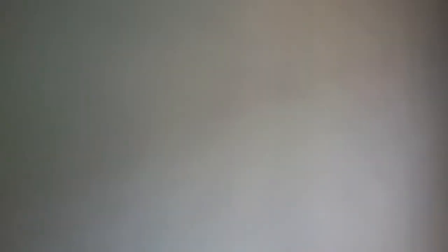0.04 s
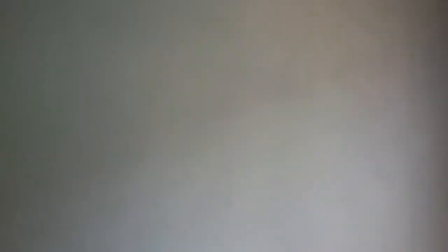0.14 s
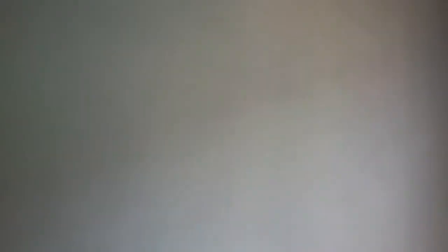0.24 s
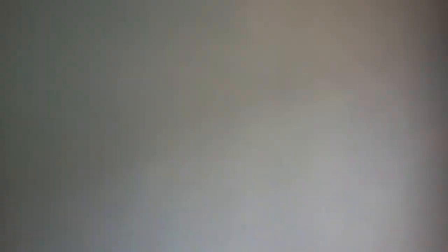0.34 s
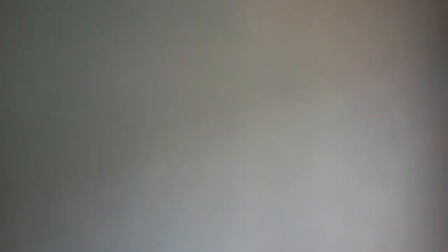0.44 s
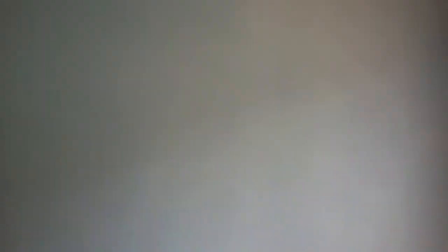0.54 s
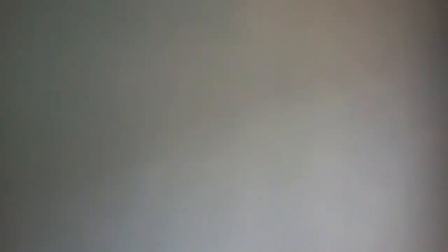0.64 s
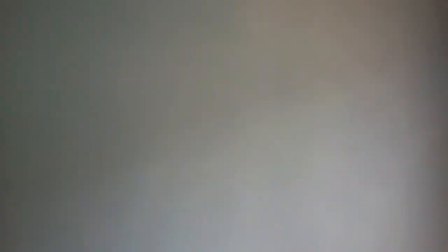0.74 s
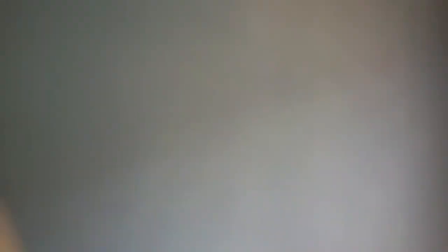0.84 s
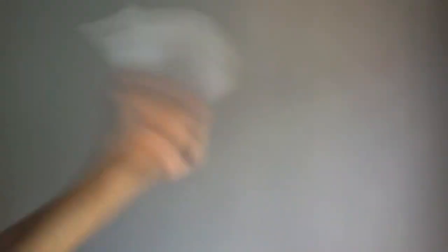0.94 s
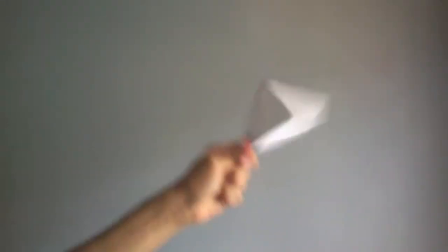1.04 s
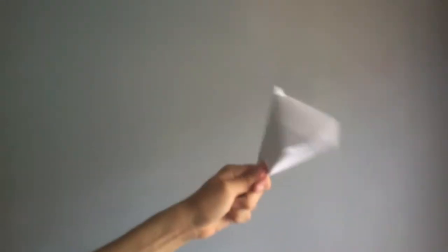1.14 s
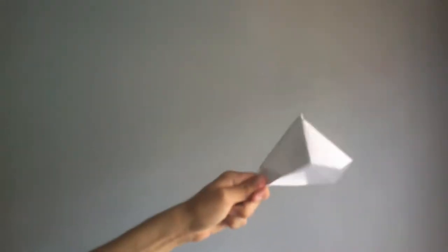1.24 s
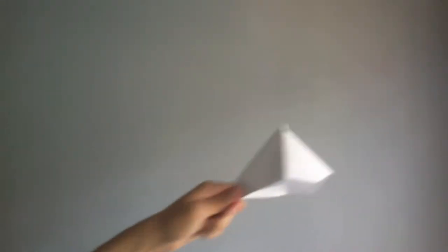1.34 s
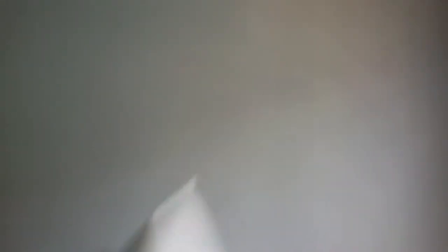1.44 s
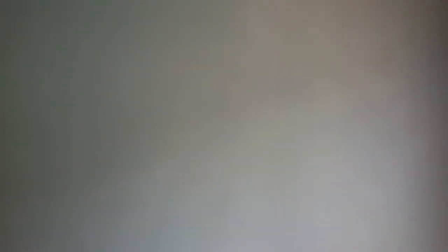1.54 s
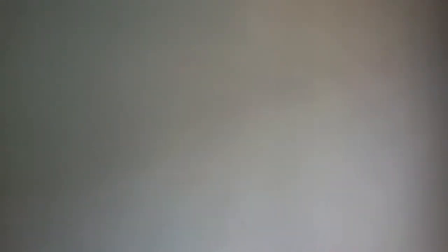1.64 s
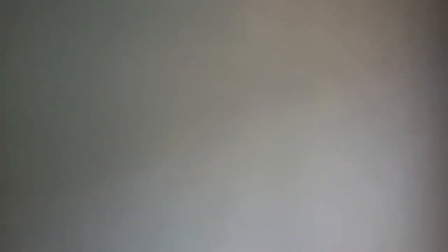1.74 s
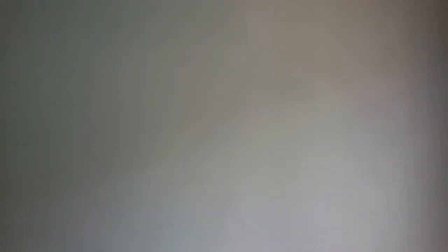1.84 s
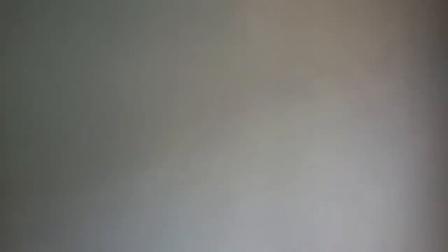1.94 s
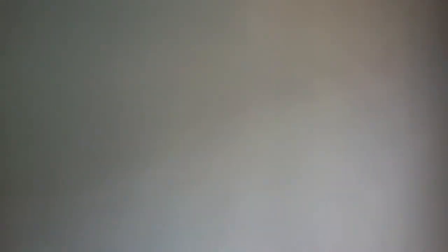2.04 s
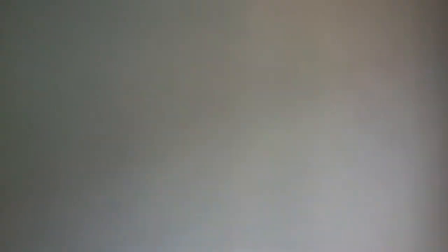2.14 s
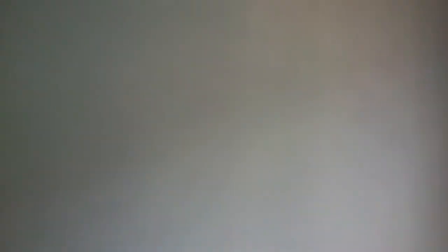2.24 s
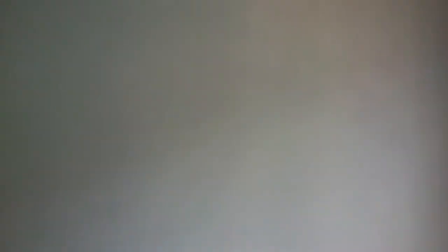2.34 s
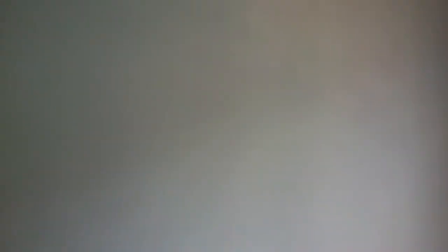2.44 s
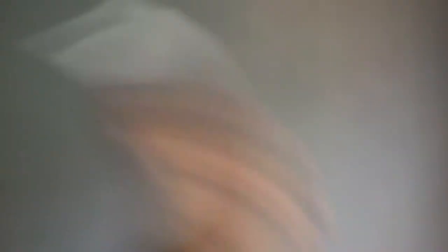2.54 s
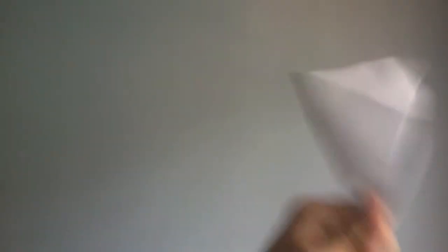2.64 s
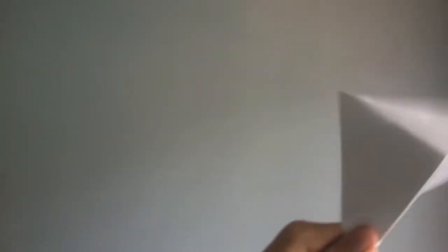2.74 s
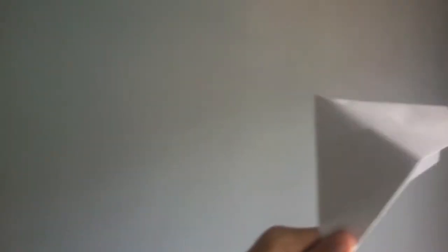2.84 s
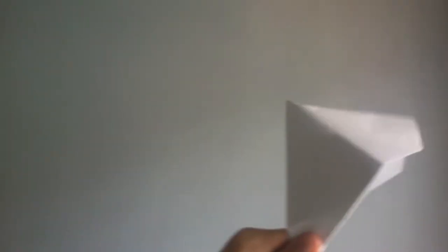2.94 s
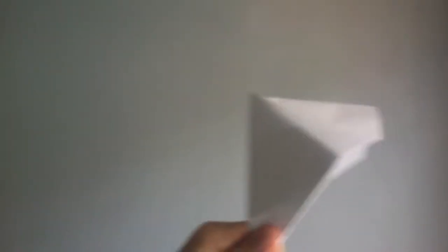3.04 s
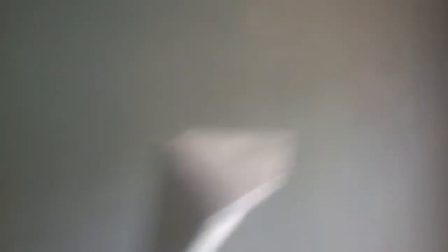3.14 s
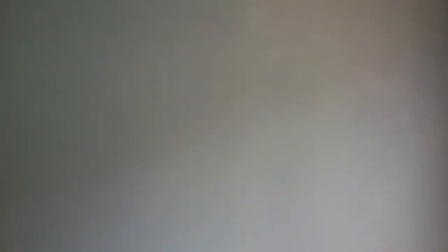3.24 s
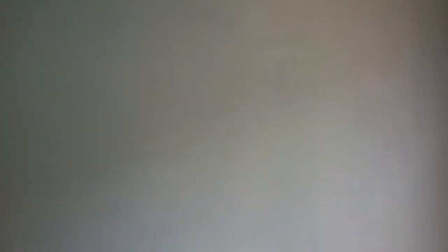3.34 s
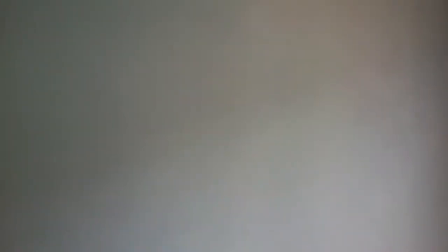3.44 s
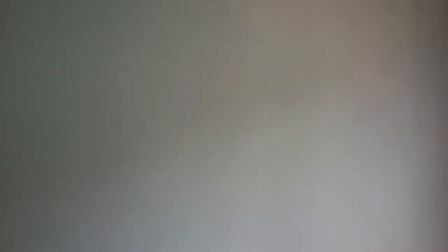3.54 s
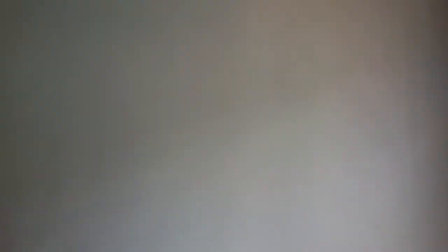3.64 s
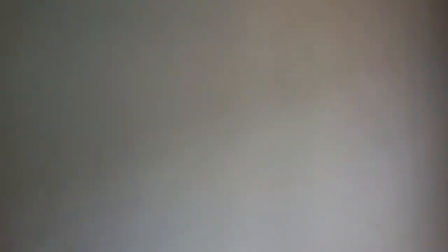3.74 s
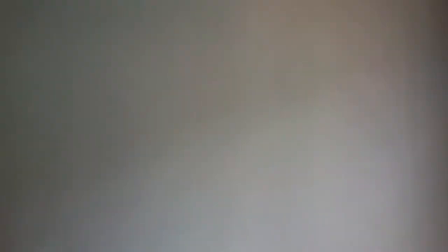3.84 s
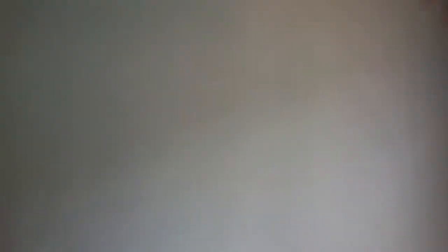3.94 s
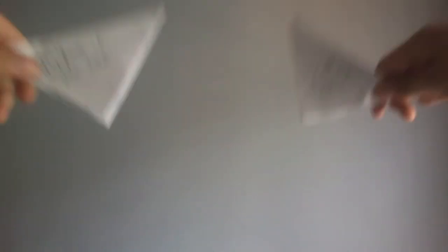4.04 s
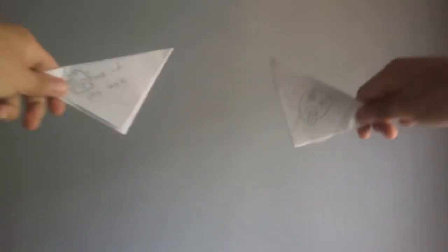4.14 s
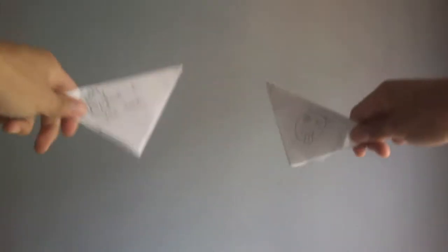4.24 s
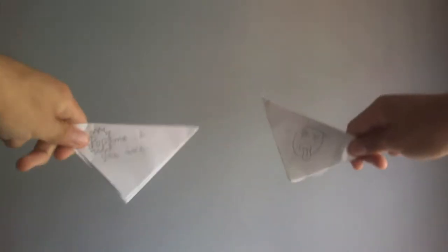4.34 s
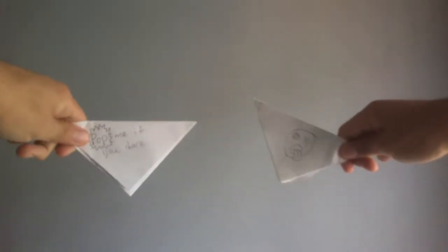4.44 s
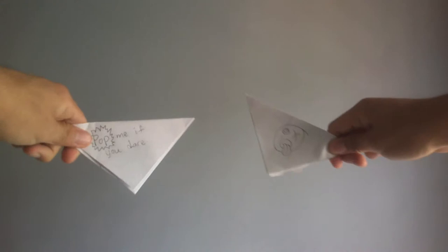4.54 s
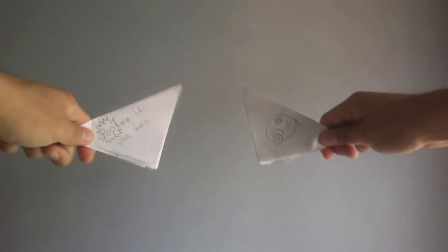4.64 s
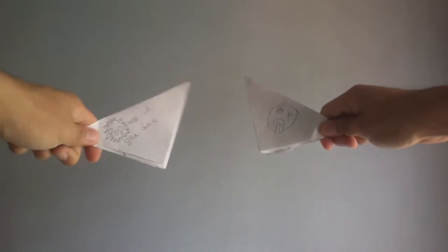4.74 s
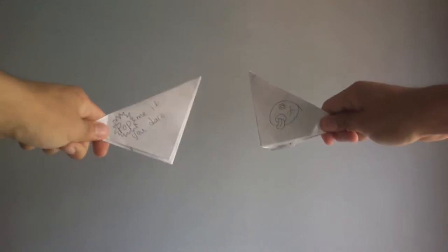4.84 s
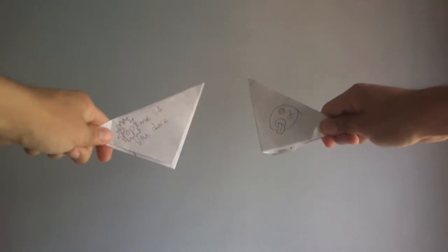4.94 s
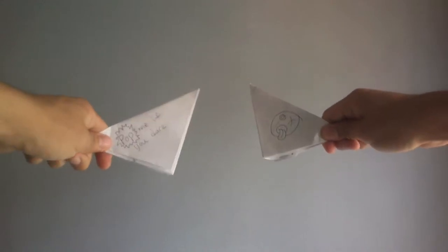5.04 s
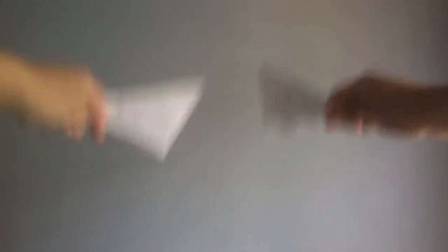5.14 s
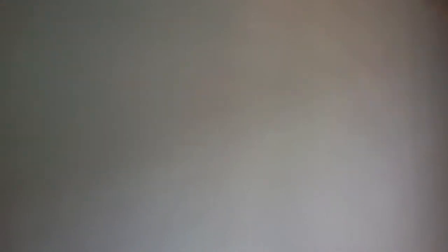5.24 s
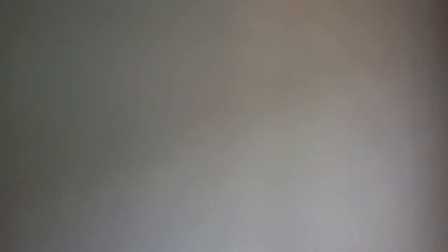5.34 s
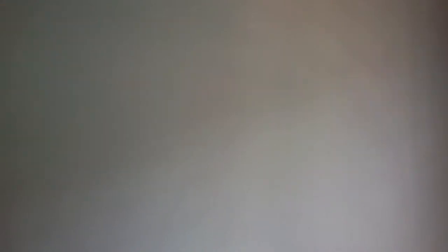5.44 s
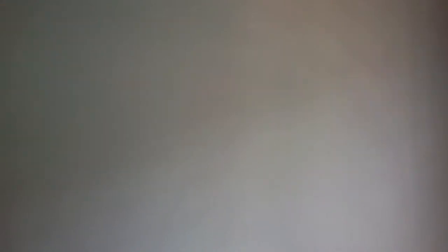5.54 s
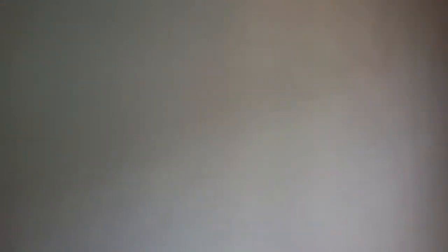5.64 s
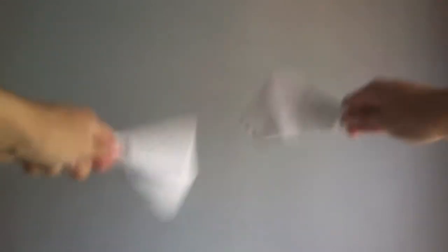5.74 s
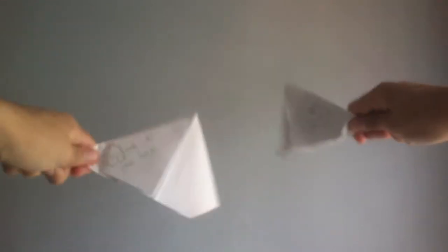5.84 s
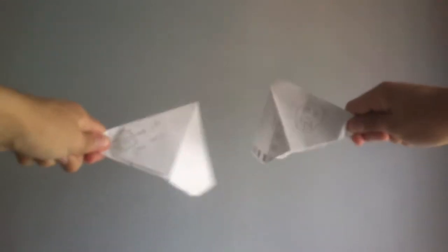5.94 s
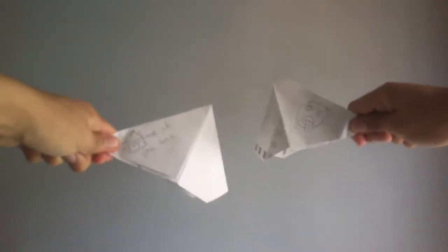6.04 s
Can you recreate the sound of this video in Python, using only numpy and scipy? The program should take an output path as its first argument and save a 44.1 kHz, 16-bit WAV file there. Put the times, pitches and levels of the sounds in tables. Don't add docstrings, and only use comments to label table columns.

```python
import sys
import numpy as np
from scipy import signal
from scipy.fft import rfft, irfft, next_fast_len
from scipy.io import wavfile
from scipy.ndimage import map_coordinates

SR = 44100
rng = np.random.default_rng(int(sys.argv[2]) if len(sys.argv) > 2 else 0)


def magnitude_from_level(level_db):
    exponent = np.asarray(level_db, float) / 20
    return 10 ** exponent


def put_to_file(sound):
    columns = np.atleast_2d(sound).T
    safe = np.clip(columns, -1, 1)
    whole_steps = np.round(safe * 32767)
    wavfile.write(sys.argv[1], SR, whole_steps.astype(np.int16))


N = 269451
T = np.arange(SR) / SR
SNAP_SIZE = SR // 50
SNAP_LEAD_S = .001

# time in seconds, length out in seconds, length in in seconds.
SCENE_FADES = [
    (.362, 0.13, 0.093),
    (2.228, 0.11, .1),
    (3.698, 0.097, 0.085),
]
# rumble in dB, room tone in dB, resting cloth in dB.
STEADY_DB = [
    (-61.5, -66, -95),
    (-63, -70, -83.5),
    (-62.5, -69, -83.5),
    (-63.5, -70, -90.5),
]
# frequency in Hz, density in dB per Hz.
RUMBLE_SPECTRUM = [(8.8, -33.5), (15, -1.5), (27, 1), (38, -1), (57, -6), (63, -9.5), (70, -21.5),
                   (110, -15.5), (140, -49), (240, -120)]
# frequency in Hz, density in dB per Hz.
TONE_SPECTRUM = [(53, -38), (90, -4), (127, -2), (151, -7), (214, -5.5), (255, -8.5), (316, -11),
                 (499, -12.5), (1110, -19), (1640, -22), (2380, -23), (4360, -28), (16000, -35.5)]
# start in seconds, level in dB, length in seconds.
GUST_PUFF = (5.7, -37, .1)
# start in seconds, length in seconds, centre in Hz, width in Hz, level in dB.
FOLD_SWISHES = [
    (5.29, .05, 500, 250, -74),
    (5.415, .07, 520, 250, -73),
    (5.43, .07, 1500, 400, -79),
    (5.56, .085, 520, 280, -69),
    (5.57, .07, 1650, 500, -74),
    (5.33, .05, 3500, 700, -79),
    (5.335, .04, 5000, 500, -81),
    (4.28, .45, 2330, 300, -80),
    (2.23, .24, 170, 90, -69),
    (.03, .2, 600, 300, -72),
]
# peak in seconds, rise in seconds, fall in seconds, cloth hiss in dB, low shuffle in dB.
ARM_GESTURES = [(0, .05, 0.12, -103, -72), (.26, .07, .12, -75, -78), (.91, 0.022, 0.079, -73, -66.5),
                (.944, 0.017, 0.0081, -52, -63.5), (1.84, 0.011, 0.08, -80, -67.5),
                (1.87, .04, .3, -71, -74), (1.98, 0.027, 0.13, -70.5, -62), (2.09, .1, 0.1, -72, -68.5),
                (2.3, 0.3, 0.048, -77, -71.5), (2.47, 0.067, 0.069, -74, -72.5),
                (3.2, 0.44, 0.17, -84, -68.5), (3.45, 0.057, .15, -74.5, -67.5),
                (3.5, 0.059, 0.11, -60.5, -63.5), (3.75, .15, .3, -83, -73.5), (3.97, .2, 0.21, -74, -75.5),
                (4.5, .25, .35, -93.5, -79), (4.66, 0.13, 0.17, -81, -85.5), (5.36, 0.34, 0.27, -81.5, -79),
                (5.6, 0.11, .15, -90, -70), (5.664, 0.052, 0.009, -66, -76)]
# peak in seconds, rise in seconds, fall in seconds, rustle in dB.
PAPER_RUSTLES = [
    (4.5, .35, 0.41, -80),
    (5.35, .15, .22, -78.5),
    (5.62, .06, .1, -76.5),
    (5.664, 0.055, .01, -64),
]
# frequency in Hz, density in dB per Hz.
DULL_CLOTH_SPECTRUM = [(2000, -30), (3500, -7.5), (5200, -0.5), (7000, -1), (8800, -4.5), (10500, -6.5),
                       (15500, -13), (16500, -35.5)]
# frequency in Hz, density in dB per Hz.
CLOTH_SPECTRUM = [(1200, -29.5), (2500, -3), (5000, 0), (7500, -0.5), (11000, -4), (15500, -6.5),
                  (16500, -27.5)]
# frequency in Hz, density in dB per Hz.
SHUFFLE_SPECTRUM = [(150, -24.5), (350, -8.5), (600, 0), (1100, 0), (1900, -3.5), (2500, -5.5),
                    (3500, -9.5), (5000, -19), (8000, -34)]
# frequency in Hz, density in dB per Hz.
PAPER_SPECTRUM = [(300, -37), (520, 5), (900, -14), (1700, -4), (2250, -2.5), (2800, -7), (4500, -8),
                  (7000, -24)]
TINK_TIMES_S = [2.152, 2.25, 2.03, 5.16, 2.25]
# level in dB, frequency in Hz, t60 in seconds.
TINK_MODES = [
    (-56, 520, .2),
    (-68, 1250, .4),
    (-70, 850, .3),
    (-68, 1250, .1),
    (-62, 140, .9),
]
# dip time in seconds, dip in dB, dip width in ms, rebound in dB, crack in dB.
SNAP_EVENTS = [
    (.94635, -12.5, .16, -14.5, -18.5),
    (2.55377, -2.3, .115, -5.5, -15),
    (5.66765, -2.5, .09, -14, -17),
    (5.6979, -7.5, .12, -22, -16.5),
]
POCKET_HZ = [1250, 1350, 1150, 600]
SHEET_HZ = [5040, 11500, 6500, 9000]
# frequency in Hz, density in dB per Hz.
CRACK_SPECTRUM = [(800, -25), (2000, -2), (3300, 1), (5000, -1), (8000, -2), (12000, -3), (15000, -7),
                  (17000, -30)]
# snap index, delay in seconds, dip in dB, crack in dB.
WALL_ECHOES = [(0, .0046, -11, -11), (0, .0107, -11, -16), (0, .0292, -7, -20), (0, .035, -14, -20),
               (1, .0053, -15, -12), (1, .0087, -13, -12), (1, .012, -16, -16), (1, .0213, -15, -18),
               (2, .0075, -11, -8), (2, .0091, -10, -11), (2, .0245, -15, -18), (2, .0216, -16, -18),
               (3, .0052, -11, -14), (3, .008, -12, -8), (3, .0157, -14, -16), (3, .0215, -12, -18)]
# level in dB, early part in dB re main, late part in dB re main.
TAIL_DB = [
    (-39, 4.5, -8),
    (-32, -0.5, -11.5),
    (-40.5, 15, -4.5),
    (-37.5, 0.5, -12),
]
# frequency in Hz, density in dB per Hz.
TAIL_SPECTRA = [
    [(35, -44), (60, -14), (160, -5.5), (400, -5), (640, -4.5), (1100, -6), (1400, -11), (1750, -4.5),
     (2250, -6.5), (2500, -8), (3200, -10), (5200, -12.5), (12700, -21), (16000, -29)],
    [(35, -35), (60, -19), (180, -12), (250, -5), (420, -4.5), (600, -4.5), (1300, -3), (1550, -6.5),
     (2150, -3.5), (2450, -6.5), (3300, -12), (5000, -14), (11000, -20.5), (16000, -30)],
    [(35, -40), (60, -15), (400, -6), (770, -11.5), (1500, -3), (2300, -8.5), (2550, 1.5), (3300, -13.5),
     (7200, -16), (16000, -25.5)],
    [(35, -53), (60, -18), (160, -11), (256, -7.5), (450, -11), (970, -12.5), (1660, -21.5), (2250, -13.5),
     (2550, -16.5), (3400, -17), (5000, -16.5), (10500, -23.5), (16000, -32)],
]
# frequency in Hz, t60 in seconds.
ROOM_T60 = [(60, 0.87), (250, 0.68), (700, 0.94), (1500, 0.79), (2500, 0.57), (5000, 0.63), (10000, 0.59),
            (16000, 0.43)]
# frequency in Hz, t60 in seconds.
LATE_T60 = [(100, 1.7), (300, 1.3), (1000, 1.4), (2250, 1.4), (2500, 1.3), (3300, 1.4), (4000, 1.05),
            (5200, 1.3), (7000, 0.8), (16000, .4)]
# frequency in Hz, level in dB, t60 in seconds.
ROOM_MODES = [
    [(644, -0.5, 0.58), (1720, -10, 0.8), (2135, -7, 0.46), (3300, -10, 0.59), (3295, -4, 0.34),
     (3640, -17.5, 0.73), (4538, -17.5, 0.61), (4800, -19, 0.57), (5300, -4.5, 0.3), (5160, 2, 0.22)],
    [(112, -16, .8), (164, -11, .6), (254, -4, 1.2), (363, 1.5, 0.45), (1001.7, -14, 0.88),
     (1210, -15, 0.82), (1420, -8.5, 0.52), (1650, -10, 0.5), (1890, -24.5, 1.3), (2140, -21.5, 2.7),
     (2934, -23, 0.7), (3520, -16, 0.33)],
    [(111.7, -2.5, .6), (171, -2.5, 0.85), (254.6, 5, 0.8), (360, -6, .5), (531, -0.5, 1), (764, 0, 0.37),
     (1280, -3, 0.52), (1650, -6, 0.69), (1840, -0.5, 0.66), (2160, -1.5, 0.55), (3040, -12, 0.57),
     (3460, -17, 0.49)],
]
# centre in Hz, width in Hz, gain in dB.
HOUSING_DIP = (2640, 380, -8)


def unit(x):
    return x / np.sqrt(np.mean(x ** 2) + 1e-20)


def along(points, hz):
    point_hz, value = np.transpose(points)
    return np.interp(np.log(hz + 1), np.log(point_hz + 1), value)


def wobble(knots_per_s):
    knots = rng.standard_normal(int(N * knots_per_s / SR) + 4)
    return map_coordinates(knots, [np.arange(N) * knots_per_s / SR])


def hiss(spectrum, size):
    m = next_fast_len(size)
    gain = magnitude_from_level(along(spectrum, np.fft.rfftfreq(m, 1 / SR)))
    return unit(irfft(rfft(rng.standard_normal(m)) * gain, m)[:size])


def add(out, start_s, x):
    part = out[round(start_s * SR):][:len(x)]
    part += x[:len(part)]


def steady_levels_db():
    change_s = [s for s, *_ in SCENE_FADES]
    return np.array(STEADY_DB)[np.searchsorted(change_s, np.arange(N) / SR)].T


def background():
    rumble_db, tone_db, _ = steady_levels_db()
    rumble = magnitude_from_level(rumble_db + 1.3 * wobble(5)) * hiss(RUMBLE_SPECTRUM, N)
    tone = magnitude_from_level(tone_db + 0.91 * wobble(13)) * hiss(TONE_SPECTRUM, N)
    return rumble + tone


def gust():
    out = np.zeros(N)
    start_s, db, length_s = GUST_PUFF
    envelope = np.sin(np.pi * np.clip(T / length_s, 0, 1))
    add(out, start_s, magnitude_from_level(db) * np.sin(2 * np.pi * 17 * T) * envelope)
    return out


def swishes():
    out = np.zeros(N)
    for start_s, length_s, hz, width_hz, db in FOLD_SWISHES:
        air = signal.lfilter(*signal.iirpeak(hz, hz / width_hz, SR), rng.standard_normal(SR))
        envelope = np.sin(np.pi * np.clip(T / length_s, 0, 1))
        add(out, start_s, magnitude_from_level(db) * unit(air) * envelope)
    return out


def swells(rows):
    swell_db, rounding = 15, 1.1
    peak_s, rise_s, fall_s, *peaks_db = np.transpose(rows)[:, :, None]
    late_s = np.arange(N) / SR - peak_s
    distance = np.maximum(-late_s / np.abs(rise_s), late_s / np.abs(fall_s))
    shape = magnitude_from_level(-swell_db * distance ** rounding)
    return [np.sqrt(((magnitude_from_level(db) * shape) ** 2).sum(axis=0)) for db in peaks_db]


def clothing():
    rub_gain, shuffle_gain = swells(ARM_GESTURES)
    resting_gain = magnitude_from_level(steady_levels_db()[2])
    early = np.arange(N) / SR < SCENE_FADES[1][0]
    cloth = np.where(early, hiss(DULL_CLOTH_SPECTRUM, N), hiss(CLOTH_SPECTRUM, N))
    rub = np.hypot(rub_gain, resting_gain) * magnitude_from_level(1.1 * wobble(60)) * cloth
    shuffle = shuffle_gain * magnitude_from_level(1.3 * wobble(40)) * hiss(SHUFFLE_SPECTRUM, N)
    return rub + shuffle


def paper():
    return swells(PAPER_RUSTLES)[0] * magnitude_from_level(2.5 * wobble(52)) * hiss(PAPER_SPECTRUM, N)


def tinks():
    out = np.zeros(N)
    onset = 1 - np.exp(-T / 0.0036)
    for start_s, (db, hz, t60_s) in zip(TINK_TIMES_S, TINK_MODES):
        add(out, start_s, magnitude_from_level(db - 60 * T / t60_s) * np.sin(2 * np.pi * hz * T) * onset)
    return out


def dying(spectrum, size, fall):
    hz, t, z = signal.stft(hiss(spectrum, SR), SR, nperseg=size)
    return signal.istft(z * fall(hz[:, None], t), SR, nperseg=size)[1][:SR]


def tail(spectrum, early_db, late_db):
    uneven = np.exp(.18 * rng.standard_normal((1025, 1)))

    def main_fall(hz, t):
        t60_s = along(ROOM_T60, hz)
        return magnitude_from_level(-60 * (t - .05) / t60_s) + magnitude_from_level(early_db - 60 * t / (0.48 * t60_s))

    def late_fall(hz, t):
        return magnitude_from_level(late_db - 60 * t / (uneven * along(LATE_T60, hz)))

    echoes = np.repeat(rng.standard_normal(SR // 20 + 1), 20)[:SR]
    sparse = magnitude_from_level(3.6 * np.exp(-T / 0.025) * echoes)
    main = dying(spectrum, 256, main_fall)
    late = dying(spectrum, 2048, late_fall)
    return (main * sparse + late) * (1 - np.exp(-(T / .003) ** 2))


def reverberation():
    out = np.zeros(N)
    for (snap_s, *_), (db, early_db, late_db), spectrum in zip(SNAP_EVENTS, TAIL_DB, TAIL_SPECTRA):
        add(out, snap_s, magnitude_from_level(db) * tail(spectrum, early_db, late_db))
    return out


def room_rings():
    out = np.zeros(N)
    onset = 1 - np.exp(-T / 0.0049)
    for k, modes, db in zip((0, 1, 3), ROOM_MODES, (-48, -43, -45)):
        ring = np.zeros(SR)
        for hz, mode_db, t60_s in modes:
            ring += magnitude_from_level(mode_db - 60 * T / t60_s) * np.sin(2 * np.pi * (hz * T + rng.random()))
        add(out, SNAP_EVENTS[k][0], magnitude_from_level(db) * ring * onset)
    return out


def flap(dip_db, width_ms, rebound_db, pocket_hz):
    t = T[:SNAP_SIZE] - SNAP_LEAD_S
    dip = -magnitude_from_level(dip_db) * np.exp(-.5 * (t * 1000 / width_ms) ** 2)
    swell = np.maximum(t - .00025, 0) / .00045
    since_top = t - .00073
    cycles = pocket_hz * since_top * (1 + np.tanh(since_top / .001) / 2)
    return dip + magnitude_from_level(rebound_db) * swell * np.exp(1 - swell) * np.cos(2 * np.pi * cycles)


def crack(db, sheet_hz):
    u = np.maximum(T[:SNAP_SIZE] - .0012, 0) / .0008
    burst = hiss(CRACK_SPECTRUM, SNAP_SIZE)
    band = signal.lfilter(*signal.iirpeak(sheet_hz, 6, SR), burst)
    return magnitude_from_level(db) * u * np.exp(1 - u) * unit(burst + 1.6 * band)


def wall_echoes():
    out = np.zeros(N)
    for k, delay_s, dip_db, crack_db in WALL_ECHOES:
        k = round(k)
        snap_s, *air, sheet_db = SNAP_EVENTS[k]
        echo = magnitude_from_level(dip_db) * flap(*air, POCKET_HZ[k]) + crack(sheet_db + crack_db, SHEET_HZ[k])
        add(out, snap_s + delay_s - SNAP_LEAD_S, echo)
    return out


def poppers():
    out = np.zeros(N)
    for (snap_s, *air, crack_db), pocket_hz, sheet_hz in zip(SNAP_EVENTS, POCKET_HZ, SHEET_HZ):
        add(out, snap_s - SNAP_LEAD_S, flap(*air, pocket_hz) + crack(crack_db, sheet_hz))
    return out


def microphone(x):
    hz, width_hz, db = HOUSING_DIP
    x = signal.lfilter(*signal.butter(2, 50, "high", fs=SR), x)
    return x - (1 - magnitude_from_level(db)) * signal.lfilter(*signal.iirpeak(hz, hz / width_hz, SR), x)


def scene():
    handling = clothing() + paper() + tinks()
    snaps = reverberation() + room_rings() + wall_echoes() + poppers()
    mono = background() + gust() + swishes() + microphone(handling + snaps)
    return np.tile(mono, (2, 1))


def top_cut(x):
    return signal.sosfilt(signal.butter(12, 16820, fs=SR, output="sos"), x)


def record(dry):
    t = np.arange(N) / SR
    for change_s, out_s, in_s in SCENE_FADES:
        gain = np.maximum((change_s - t) / out_s, (t - change_s) / in_s)
        dry = dry * np.clip(gain, .005, 1)
    band_limit = signal.ellip(8, .5, 40, 15750, fs=SR, output='sos')
    mix = signal.sosfilt(band_limit, dry)
    return top_cut(mix)


dry = scene()
out = record(dry)
put_to_file(out)
```